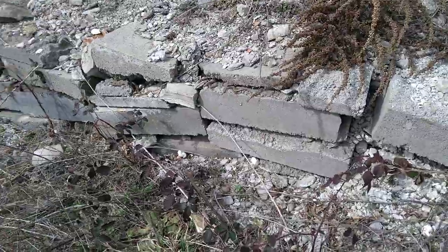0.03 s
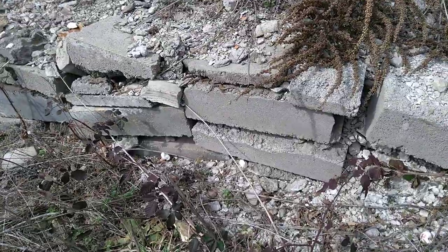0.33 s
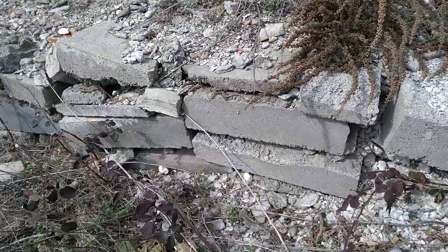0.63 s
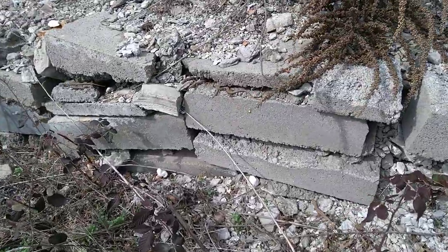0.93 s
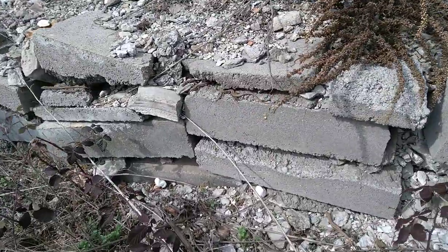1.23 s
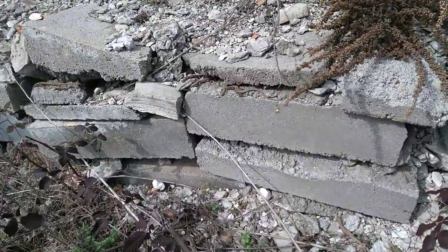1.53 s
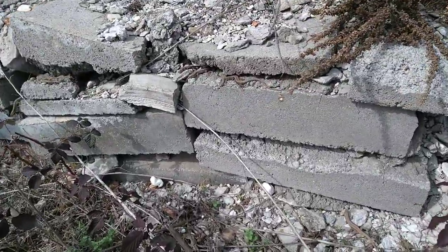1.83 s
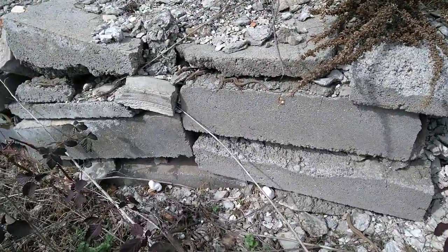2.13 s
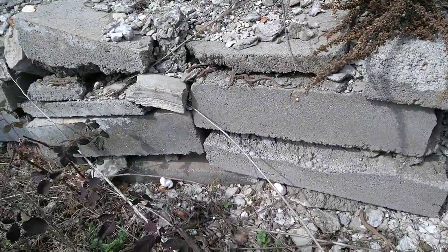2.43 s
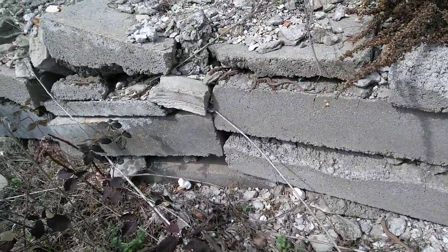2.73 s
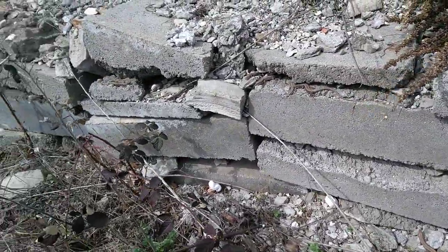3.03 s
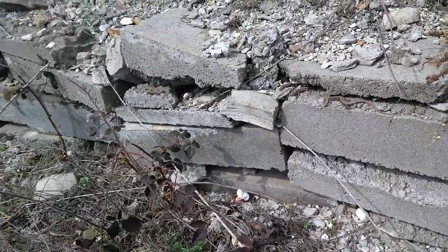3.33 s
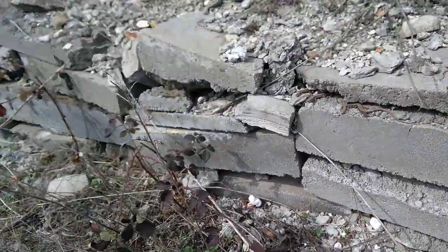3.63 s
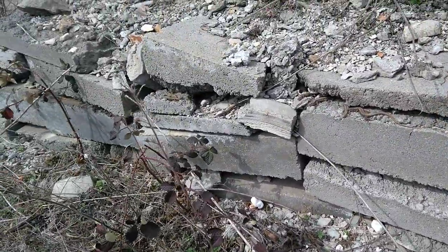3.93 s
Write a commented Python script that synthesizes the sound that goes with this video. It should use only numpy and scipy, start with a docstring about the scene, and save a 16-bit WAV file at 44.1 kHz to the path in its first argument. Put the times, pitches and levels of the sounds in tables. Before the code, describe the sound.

Wind buffets the microphone outdoors, with small ticks and a snap from dry plants.

```python
"""Gusty wind rumble: eddies buffet both ports of a hand-held microphone, the right one hardest.
Dry weeds rustle and tick as someone shifts through them; one stalk snaps.
A rubble wall nearby scatters the stalk cracks faintly.
Underneath: a faint outdoor hush and a thin hiss."""
import sys
import numpy as np
from scipy import signal
from scipy.fft import rfft, irfft
from scipy.io import wavfile
from scipy.ndimage import uniform_filter1d, map_coordinates

SR = 44100
rng = np.random.default_rng(int(sys.argv[2]) if len(sys.argv) > 2 else 0)


def transcribe(u):
    """Save the signal u as a 16-bit wav file named by the first command-line argument.

    u: samples, shape (n,) or (channels, n), limited to [-1, 1]; the rate is SR.
    q: integer samples, one column per channel.
    """
    v = np.clip(np.atleast_2d(u).T, -1, 1)
    q = np.round(v * 32767).astype(np.int16)
    wavfile.write(sys.argv[1], SR, q)


N = 176400

# buffets per port: [t/s, hold/s, level/dB before port gain]
BUFFETS_LEFT = [(0.018, 0.081, -24), (0.267, 0.088, -25), (0.479, 0.58, -28.5), (0.725, 0.12, -22.5),
                (1.884, 0.01, -24), (2.863, 0.12, -31), (3.104, 0.28, -28.5), (3.123, 0.017, -19),
                (3.5, 0.16, -23.5)]
BUFFETS_RIGHT = [(0, 1.126, -23), (0.249, 0.099, -18.5), (0.558, 0.0635, -15), (0.652, 0.37, -20.5),
                 (1.384, 0.32, -19), (1.547, 0.052, -12), (1.752, 0.041, -18), (1.887, 0.48, -21.5),
                 (2.189, 0.12, -13), (2.463, 0.13, -18), (2.621, 0.39, -17), (2.998, 0.29, -12.5),
                 (3.36, 0.3, -18), (3.827, 0.17, -18)]
# short air slaps, right port: [t/s, level/dB before port gain, eddy speed offset/dB]
SLAPS_RIGHT = [(0.189, -17, 0), (0.257, -17, 0.5), (0.316, -12.5, -0.86), (0.354, -16, 3),
               (0.553, -13, 2.5), (0.573, -16, 2.5), (0.588, -14, 1.54), (0.605, -13.5, 1.5),
               (0.782, -19, 1), (0.93, -13.5, -0.5), (0.95, -12, 1), (1.074, -20, 1), (1.553, -9.5, -2.5),
               (1.581, -8.5, -3.5), (1.778, -18, 2), (2.184, -6.5, -1.89), (2.205, -10, -1),
               (2.471, -15, 1), (2.496, -13.5, 2.5), (2.544, -15, 3.5), (2.638, -9, 1.17), (2.658, -14, 2),
               (2.713, -8, -4), (2.773, -15.5, 5.5), (2.804, -5, 1.5), (2.834, -12.5, 0), (2.848, -14, 2),
               (3.019, -5, -3), (3.102, -5.5, 0.5), (3.138, -12, 1), (3.157, -4, 6.5), (3.185, -11.5, 6),
               (3.196, -8.5, 5.5), (3.218, -8, 2), (3.247, -8.5, -0.5), (3.28, -12, 5), (3.36, -14, 0.69),
               (3.423, -10.5, 2), (3.526, -12, -1.5), (3.606, -13, -0.5), (3.878, -7.5, -1),
               (3.959, -11, 2)]
# eddy pressure spectrum at unit speed: [f/Hz, relative level/dB]
EDDY_SPECTRUM = [(30, 3.5), (90, 5.5), (200, -4.5), (400, -13.5), (700, -29), (1100, -51), (1800, -66.5),
                 (3500, -105)]
# stalk ticks and the snap: [t/s, relative level/dB, left minus right/dB, body offset/dB]
STALK_CRACKS = [(0.2632, -23, 9, -32), (0.2963, -14.5, 1.5, -14), (0.4506, -25, 13.5, -30),
                (0.4815, -21.5, 5, 2), (0.534, -17, 7, -29), (0.7437, -17, -0.5, 4.5),
                (1.0715, -25.5, 7, -14), (1.0993, 4.5, 5, -7), (1.1353, -15.5, 9, -12),
                (1.1379, -12, -2, -4), (1.263, -21.5, -6.5, -3), (1.337, -26, 7, -8),
                (1.482, -23.5, 0, -20), (1.667, -22.5, -5, 2), (1.76, -24, -7.5, 2),
                (1.7817, -25.5, -3, -16), (2.657, -31.5, -1.5, -8.5), (3.067, -35, -4, -5),
                (3.207, -20.5, 4, -23), (3.213, -19, 0, 3)]
# woody stalk body: [f/Hz, relative level/dB]
BODY_SPECTRUM = [(200, -10), (650, 20), (1700, 7), (3000, 8), (10000, 0)]
# leaf rustle envelope: [t/s, level/dB]
RUSTLE_ENVELOPE = [(0, -50.5), (.5, -48), (1.301, -54.5), (1.482, -48), (1.58, -56.5), (1.999, -68)]
# colour of crackle and hiss per port: [f/Hz, relative level/dB]
CRISP_SPECTRUM_LEFT = [(1500, -23), (5000, -19), (8000, -11.5), (10000, -2.5), (12500, -12), (14000, -15),
                       (16000, -19)]
CRISP_SPECTRUM_RIGHT = [(1500, -12.5), (4400, -5.5), (5500, -8), (8300, -3), (12000, -4.5), (14000, -8),
                        (16000, -22)]
# outdoor hush: [f/Hz, relative level/dB]
HUSH_SPECTRUM = [(30, -25), (60, 7.5), (480, -2.5), (800, -17), (1600, -21), (4200, -30), (16000, -55)]

LEFT_GAIN_DB, RIGHT_GAIN_DB = 6.5, -0.44
LEFT_BREEZE_DB, RIGHT_BREEZE_DB = -37.5, -33.5
LEFT_SPEED_DB, RIGHT_SPEED_DB, BREEZE_SPEED_DB = -1.66, -3.0, -0.95   # eddy speed offsets
SPEED_REF_LEVEL_DB, SPEED_DB_PER_DB = -20, 0.33
BUFFET_RISE_DB_PER_S, BUFFET_FALL_DB_PER_S = 916.5, 491.5
SLAP_HOLD_S, SLAP_RISE_DB_PER_S, SLAP_FALL_DB_PER_S = 0.009, 3993, 1150.5
FLUTTER_HZ, FLUTTER_DB = 18, 1.53
SWIRL_HZ, SWIRL_SPEED_DB, SWIRL_LEVEL_DB = 130, 3.0, 1.5
EDDY_SPAN_S = 0.011
PORT_LOW_CUT_HZ, HIGH_CUT_HZ = 48.7, 15900

CRACK_ATTACK_S, CRACK_HOLD_S, CRACK_T60_S = 0.0016, 0.00097, 0.002
CRACK_DB, BODY_DB = -11, -17.5
SPLINTER_DB, SPLINTER_T60_S = -6, 0.032
SCATTER_DB, SCATTER_T60_S = -31, 0.62

TOUCHES_PER_S, TOUCH_SPREAD_DB, RUSTLE_PAN_DB = 520, 2.5, 2.5
LEAF_LOW_HZ, LEAF_HIGH_HZ, LEAF_Q = 5030, 14600, 1.5
HUSH_DB, HISS_DB, HISS_PAN_DB = -40.5, -57.5, 2


def wind():
    """Each port takes its own buffets; small eddies also slap the right one."""
    left = [(air_push(t, hold_s, db), LEFT_SPEED_DB) for t, hold_s, db in BUFFETS_LEFT]
    right = [(air_push(t, hold_s, db), RIGHT_SPEED_DB) for t, hold_s, db in BUFFETS_RIGHT]
    slaps = [(air_push(t, SLAP_HOLD_S, db, SLAP_RISE_DB_PER_S, SLAP_FALL_DB_PER_S), speed_db)
             for t, db, speed_db in SLAPS_RIGHT]
    return np.array([from_db(LEFT_GAIN_DB) * port_rumble(left, LEFT_BREEZE_DB),
                     from_db(RIGHT_GAIN_DB) * port_rumble(right + slaps, RIGHT_BREEZE_DB)])


def air_push(at_s, hold_s, db, rise_db_per_s=BUFFET_RISE_DB_PER_S, fall_db_per_s=BUFFET_FALL_DB_PER_S):
    """Level/dB of one push of air: rise until at_s, hold, fall."""
    t = np.arange(N) / SR
    return db - rise_db_per_s * np.maximum(at_s - t, 0) - fall_db_per_s * np.maximum(t - at_s - hold_s, 0)


def port_rumble(pushes, breeze_db):
    """Eddies swirl over one port: harder push, louder and higher rumble."""
    pushes = pushes + [(np.full(N, breeze_db), BREEZE_SPEED_DB)]
    flutter_db = FLUTTER_DB * drift(FLUTTER_HZ)
    swirl = np.tanh(drift(SWIRL_HZ))
    level_db = np.max([db for db, _ in pushes], axis=0) + flutter_db
    speed_db = np.max([SPEED_DB_PER_DB * (db + flutter_db - SPEED_REF_LEVEL_DB) + offset_db
                       for db, offset_db in pushes], axis=0)
    travel = np.cumsum(from_db(speed_db + SWIRL_SPEED_DB * swirl))
    eddies = coloured(rng.standard_normal(2 * N), EDDY_SPECTRUM)
    span = int(EDDY_SPAN_S * SR)
    eddies /= np.sqrt(uniform_filter1d(uniform_filter1d(eddies ** 2, span), span))   # even strength
    pressure = map_coordinates(eddies, [travel], mode="wrap") * from_db(level_db + SWIRL_LEVEL_DB * swirl)
    return signal.sosfilt(signal.butter(6, PORT_LOW_CUT_HZ, "high", fs=SR, output="sos"), pressure)


def stalks():
    """Dry stalks crack: sharp burst, woody body, brief splintering, faint scatter off the rubble."""
    crack, body = np.zeros((2, N)), np.zeros((2, N))
    for t, db, pan_db, body_db in STALK_CRACKS:
        start = int(t * SR)
        age_s = np.arange(min(SR // 2, N - start)) / SR
        attack = np.minimum(age_s / CRACK_ATTACK_S, 1) ** 2
        burst = from_db(-60 * np.maximum(age_s - CRACK_ATTACK_S - CRACK_HOLD_S, 0) / CRACK_T60_S)
        splinter = from_db(SPLINTER_DB - 60 * age_s / SPLINTER_T60_S)
        scatter = from_db(SCATTER_DB - 60 * age_s / SCATTER_T60_S)
        envelope = attack * np.hypot(burst, splinter + scatter) * from_db(db) * panned(pan_db)
        crack[:, start:start + len(age_s)] += envelope * from_db(CRACK_DB)
        body[:, start:start + len(age_s)] += envelope * from_db(BODY_DB + body_db)
    return crack * crisp(stereo_noise()) + body * coloured(stereo_noise(), BODY_SPECTRUM)


def leaves():
    """Dry leaves rub: tiny ticks of random size and pitch over brushing noise."""
    level_db = np.interp(np.arange(N) / SR, *np.transpose(RUSTLE_ENVELOPE))
    sizes = from_db(TOUCH_SPREAD_DB * np.minimum(rng.exponential(1, N), 5))
    touches = (rng.random(N) < TOUCHES_PER_S / SR) * sizes * stereo_noise()
    pitches_hz = np.geomspace(LEAF_LOW_HZ, LEAF_HIGH_HZ, 10)
    touch_hz = rng.choice(pitches_hz, N)
    ticks = sum(signal.lfilter(*signal.iirpeak(hz, LEAF_Q, fs=SR), touches * (touch_hz == hz) + 1e-18)
                for hz in pitches_hz)
    return crisp(rms_one(ticks) + stereo_noise()) * from_db(level_db) * panned(RUSTLE_PAN_DB)


def hush():
    """Steady low outdoor noise."""
    return from_db(HUSH_DB) * coloured(stereo_noise(), HUSH_SPECTRUM)


def hiss():
    """Steady thin hiss, slightly left."""
    return from_db(HISS_DB) * panned(HISS_PAN_DB) * crisp(stereo_noise())


def from_db(db):
    """Decibels to gain."""
    return 10 ** (np.asarray(db) / 20)


def rms_one(x):
    """Scale to unit rms."""
    return x / np.sqrt(np.mean(x ** 2) + 1e-20)


def panned(db):
    """Channel gains for left minus right in dB."""
    return from_db([[db / 2], [-db / 2]])


def stereo_noise():
    """White noise, independent per channel."""
    return rng.standard_normal((2, N))


def coloured(x, spectrum):
    """Filter by a spectrum table; unit rms."""
    hz, db = np.transpose(spectrum)
    f = np.fft.rfftfreq(x.shape[-1], 1 / SR)
    gain = from_db(np.interp(np.log(f + 1), np.log(hz), db))
    return rms_one(irfft(rfft(x) * gain, x.shape[-1]))


def crisp(x):
    """Bright crackle colour; unit rms per channel."""
    return np.array([coloured(x[0], CRISP_SPECTRUM_LEFT), coloured(x[1], CRISP_SPECTRUM_RIGHT)])


def drift(rate_hz):
    """Smooth random motion, rate_hz / 4 to about rate_hz; unit rms."""
    f = np.fft.rfftfreq(N, 1 / SR)
    band = (f > rate_hz / 4) / np.sqrt(1 + (f / rate_hz) ** 4)
    return rms_one(irfft(rfft(rng.standard_normal(N)) * band, N))


def scene():
    """Wind over weeds and background."""
    return hiss() + wind() + stalks() + leaves() + hush()


def record(dry):
    """Soft peak limit, then steep high cut."""
    limited = dry / (1 + (dry / 0.85) ** 4) ** 0.25
    return signal.sosfilt(signal.ellip(10, 0.1, 80, HIGH_CUT_HZ, fs=SR, output="sos"), limited)


dry = scene()
out = record(dry)
transcribe(out)
```